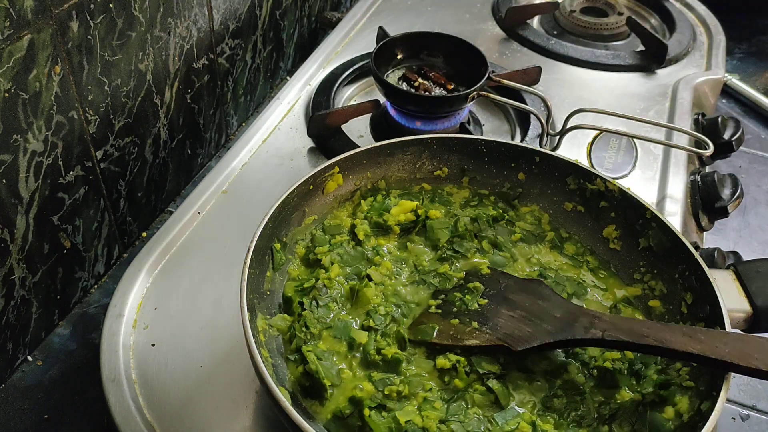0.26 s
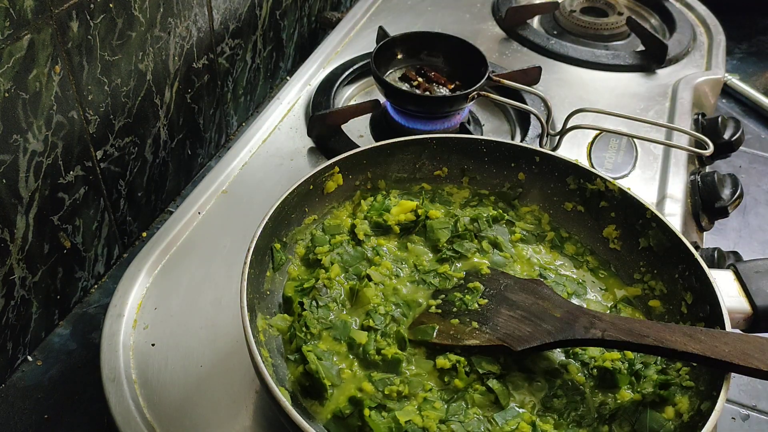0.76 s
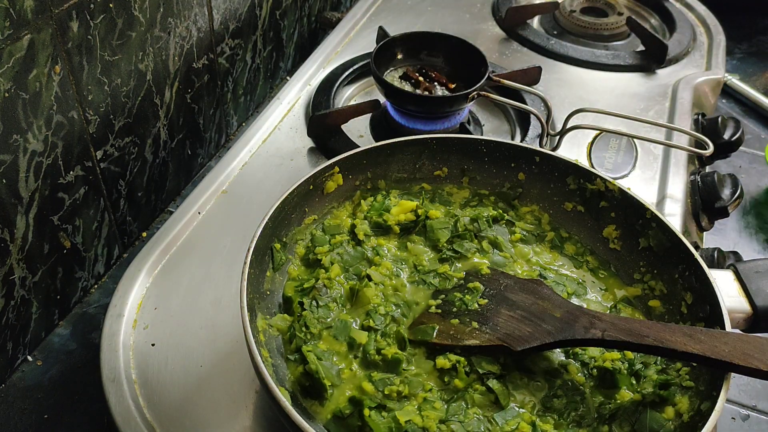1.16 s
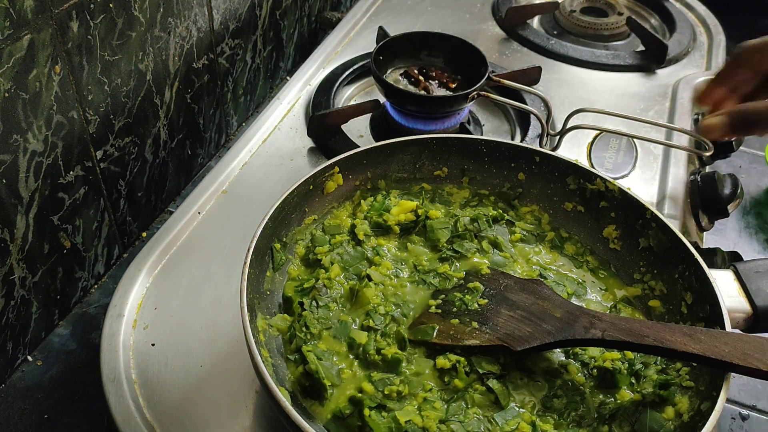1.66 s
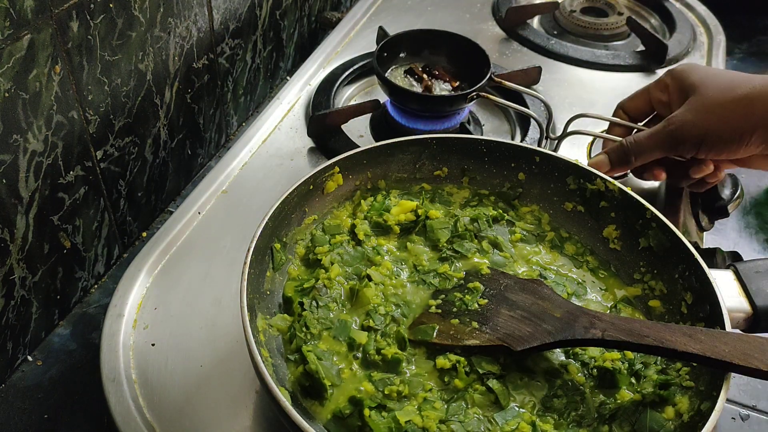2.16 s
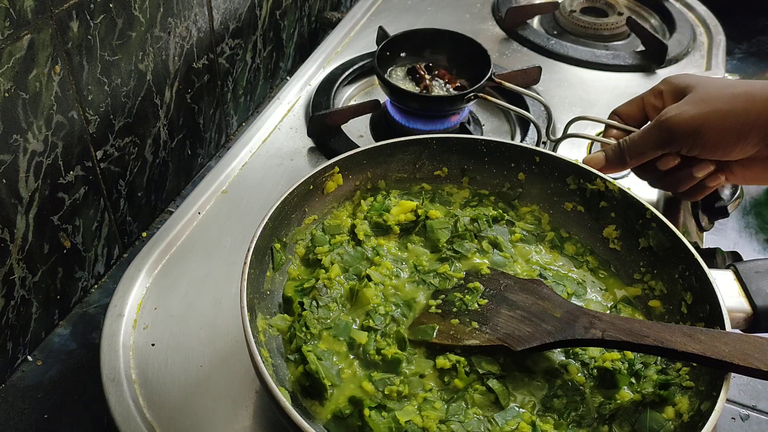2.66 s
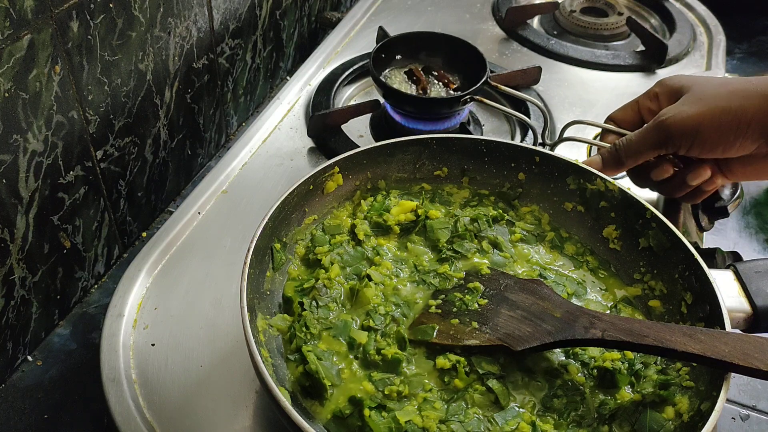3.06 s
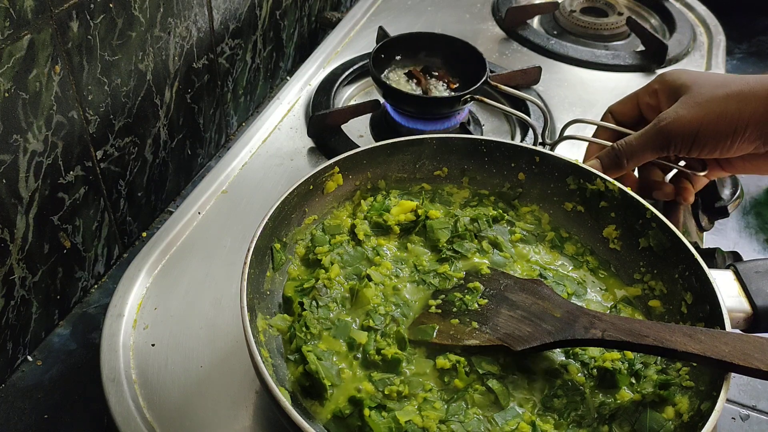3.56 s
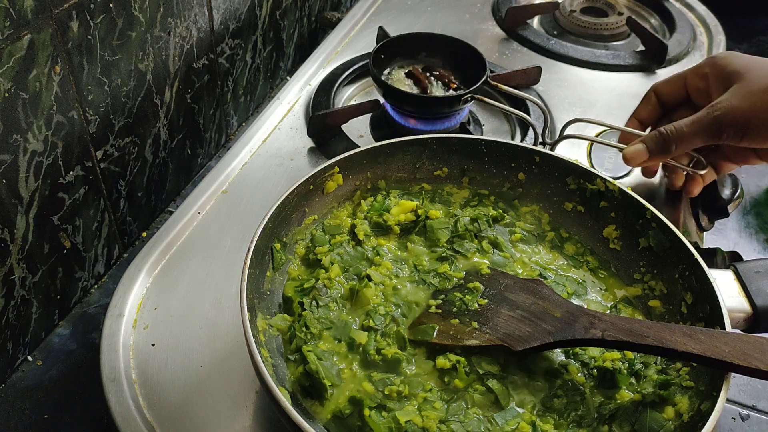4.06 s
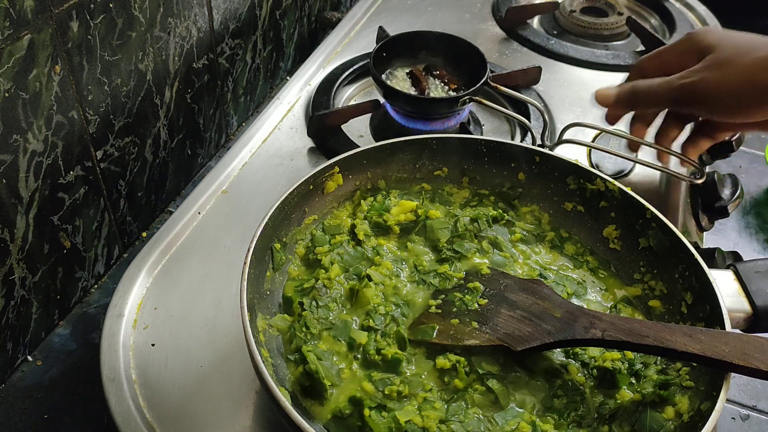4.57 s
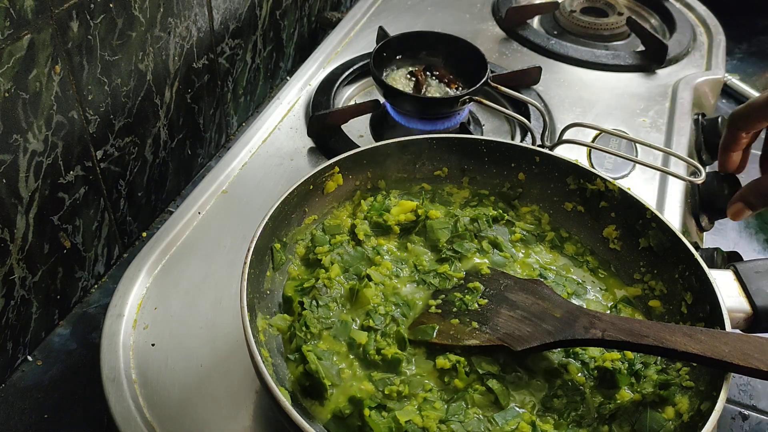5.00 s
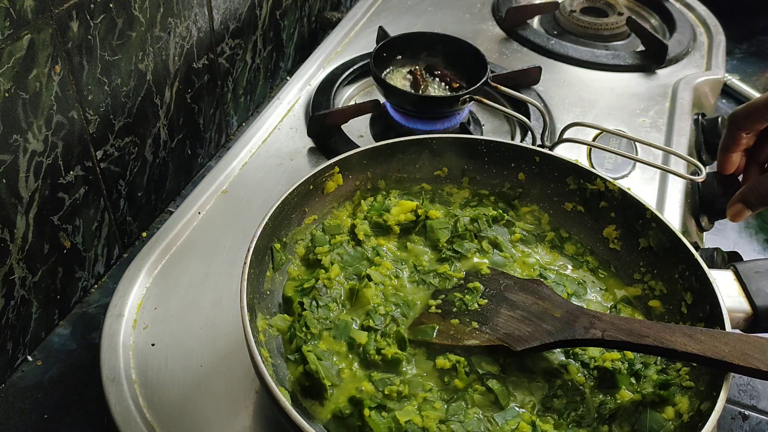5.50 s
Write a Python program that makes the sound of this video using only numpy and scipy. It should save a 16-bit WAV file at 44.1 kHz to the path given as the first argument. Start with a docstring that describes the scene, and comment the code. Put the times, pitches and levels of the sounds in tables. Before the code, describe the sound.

Seeds and lentils pop in hot oil in a small pan, sparse at first, then busier and louder over a faint sizzle. Midway the pan and its wire handle knock lightly on the metal burner stand. A gas flame rushes softly throughout, and a low engine hum from outside swells towards the end. The sound is close, each pop ringing briefly in a hard-walled kitchen.

```python
"""Seeds and lentils pop in hot oil in a small pan on a gas stove; each pop rings out in a hard-walled kitchen.
A hand takes the pan's wire handle and knocks it on the burner stand; the flame rushes softly.
A low engine hum from outside swells towards the end."""
import sys
import numpy as np
from scipy import signal
from scipy.io import wavfile
from scipy.ndimage import uniform_filter1d

SR = 44100
rng = np.random.default_rng(int(sys.argv[2]) if len(sys.argv) > 2 else 0)


def store_wav(level_fs):
    """Save 16-bit WAV to argv[1]."""
    pcm = np.round(np.clip(np.atleast_2d(level_fs), -1, 1) * 32767)
    wavfile.write(sys.argv[1], SR, pcm.T.astype(np.int16))


N = 253134

# the louder seeds bursting: (s, snap dB, snap Hz, puff dB, puff Hz, tick dB, left-right dB of the snap)
POPS = [(0.0056, -43, 5820, -69, 2400, -74, -8), (0.1039, -32.5, 6200, -51.5, 3860, -67, -1.5),
        (0.2151, -42, 5900, -63, 3800, -67, 4), (0.4315, -48.5, 6400, -67, 2700.0, -67, 4),
        (0.6102, -56, 5600, -67, 3860.0, -71, -1.5), (0.7129, -44.5, 6100, -59, 2140.0, -67, 5),
        (0.8872, -55, 5970, -60, 2500, -70, 2.5), (0.9449, -40, 7060, -65, 3140, -64, -5),
        (0.9741, -44.5, 5780.0, -43, 2230, -45, -5), (1.0121, -39, 7070.0, -56, 2130.0, -58, -4.5),
        (1.0422, -43, 6200, -54, 4100, -75, 3.5), (1.0433, -33.5, 6200, -60, 3000.0, -46, 3.5), (1.3107, -36, 6180, -49, 2060, -45.5, -1.5),
        (1.5063, -49, 5900, -43.5, 3120, -65, -12), (1.5533, -41, 6470.0, -52, 3550.0, -68, 2),
        (1.5802, -40.5, 6200, -45, 3380, -53, 6), (1.5921, -37.5, 7110.0, -37.5, 2940, -54, -7),
        (1.5966, -42, 5600, -57, 4140.0, -63.5, 4), (1.7099, -51, 5940, -55, 3140.0, -71, -1),
        (1.7453, -46.5, 6600, -64.5, 2810, -76.0, 2), (1.7777, -48.5, 6740.0, -54.5, 2690, -66, 1),
        (1.8092, -44.5, 6470, -72, 2650.0, -70, -0.5), (1.8743, -43, 5640, -51, 3860, -67, -8),
        (1.9163, -50, 5500, -43.5, 2380, -62, -10), (1.9532, -37, 7100, -41.5, 2720.0, -72, -5),
        (1.9578, -38, 7180.0, -59, 2820, -57, -4), (1.9661, -33.5, 5570, -37.5, 3720, -62, 4),
        (1.9907, -56, 5660, -50, 2590.0, -62.5, -2), (2.0169, -36, 5820.0, -40, 3390.0, -56, 1),
        (2.0216, -27.5, 7840, -36, 3070, -40.5, -7.5), (2.0866, -31.5, 5400, -58, 3900, -70, 1),
        (2.1125, -43, 6600, -49, 3900, -66, 0), (2.2698, -31.5, 6870, -44.5, 2980, -49, -0.5), (2.3368, -42, 5900, -36, 3660, -64, 7),
        (2.378, -52, 5200, -50, 3900, -66, 0), (2.4382, -49, 6750, -70, 3450.0, -60, 8), (2.4978, -49, 5600, -58, 4000.0, -70, 1.5),
        (2.5155, -46, 6840, -51, 2600, -68, -4), (2.601, -47, 6500, -51, 3980, -68.5, -2.5), (2.6102, -31.5, 7400, -41, 3630, -69, -8.5),
        (2.6705, -37.5, 6600, -41.5, 2520, -60, -4), (2.7234, -50, 6000, -57, 2120.0, -45, 9),
        (2.8078, -52, 5130.0, -64, 2500, -53, 0), (2.8282, -47, 6100, -44, 3420, -46, 0),
        (2.8453, -39.5, 7100, -62, 2230, -60, -1), (2.8823, -35, 6730.0, -66, 3080, -63, 2.5),
        (2.8988, -32, 5940, -35.5, 3850.0, -44, 0), (2.9797, -40, 6100, -45, 2680, -48, -2.5),
        (3.0007, -55, 4950.0, -55, 3280, -57, -8), (3.0131, -46, 5120, -40.5, 3200.0, -75, -8),
        (3.0217, -32.5, 5530, -57, 3320, -61, 1.5), (3.0369, -34, 6160, -42, 3770, -48.5, -4),
        (3.095, -47, 4600, -47, 3650, -69, -11), (3.1415, -46, 7040.0, -49, 2650, -61, 5),
        (3.1517, -35.5, 6200, -36.5, 3140, -64, -9), (3.1647, -32, 5600, -40.5, 2750, -49, 3.5),
        (3.1943, -42, 4800, -41, 4000, -58, 2), (3.2551, -42.5, 6950, -50, 3770.0, -73, 7),
        (3.2851, -49, 6160, -58, 2100, -60, -4), (3.3248, -45, 6300, -44, 3200, -68, 2), (3.3263, -30.5, 4950, -60, 3540, -65, 1.5),
        (3.3565, -47, 5800, -53, 3440, -62, -2), (3.3804, -38, 6100, -60, 2760.0, -73, 6),
        (3.4542, -35.5, 6660, -41, 3310.0, -72, -1), (3.468, -43, 6200, -59, 3500, -68, 2), (3.4813, -43.5, 6060, -38, 2280, -44.5, 6),
        (3.5041, -47, 5600.0, -43, 3520, -62, 2), (3.513, -44, 6680.0, -55, 2340, -76, -2),
        (3.5297, -40.5, 5350.0, -43, 3370.0, -63, 2), (3.5445, -32.5, 5850, -38, 2640, -39.5, -2),
        (3.5827, -26, 6740, -37.5, 3380, -44, 4.5), (3.6531, -54, 6220.0, -44, 1980.0, -64, -4),
        (3.6559, -40, 5670.0, -47, 3240.0, -61, -3), (3.6631, -37.5, 6950, -45, 2920.0, -50, 4),
        (3.6678, -44, 5400, -48, 2960, -72, 6), (3.7143, -34.5, 5080.0, -36.5, 3290, -57, -11),
        (3.7352, -43.5, 5790.0, -60, 2570.0, -71, 6.5), (3.7815, -33, 6630, -36.5, 2450, -52, 1),
        (3.8519, -57, 5610.0, -60, 2940, -68, 2), (3.8724, -33, 6400, -45, 3400.0, -65, -1),
        (3.8911, -31, 5570, -32.5, 3130.0, -48, -7), (3.9135, -36, 7100, -46, 3010.0, -51, 3),
        (3.9303, -34, 5500, -29.5, 3390.0, -48, 0), (3.94, -29, 6050, -48, 2320.0, -54, -6),
        (4.0228, -35.5, 6360, -38.5, 3370, -68, 2), (4.0642, -31, 6770, -48, 3440.0, -47, 2.5),
        (4.1203, -32, 6750, -46.5, 2390, -50, -8), (4.19, -27.5, 6020, -28, 3830, -41.5, 2),
        (4.2426, -37.5, 5800, -57, 2920.0, -58, 0.0), (4.2925, -28.5, 4950, -38, 3450, -66, -2.5),
        (4.3161, -45, 6970, -57, 1970.0, -64, -6), (4.3403, -48.5, 5910.0, -50, 3200, -66, 1),
        (4.4029, -53, 5990.0, -56, 2940.0, -48, 5), (4.4727, -56, 4580.0, -43, 2700, -65, -10),
        (4.4901, -33.5, 5270, -38.5, 2750.0, -66, 4.5), (4.5086, -27.5, 6650, -38.5, 3030, -57, -2.5),
        (4.5641, -38, 7160.0, -43, 3360, -55, -3), (4.5833, -36.5, 6600, -42.5, 3330, -46, 1.5),
        (4.638, -54, 5630, -52, 3300, -67, -3), (4.672, -40.0, 6500, -33, 3080, -65, -2),
        (4.6903, -31, 6170, -36.5, 4200, -62, -7.5), (4.7325, -43, 6100, -47, 3400, -64, 0), (4.749, -54, 6000, -44, 2270, -61, 0), (4.767, -40.5, 5450, -46, 2480.0, -59, -11),
        (4.7844, -34, 6800, -42.5, 2630, -54, 2.5), (4.8264, -54, 5240.0, -50, 3710.0, -62, 0),
        (4.8395, -34.5, 5600, -52, 2930, -65, -2.5), (4.8911, -33, 7100, -46, 3350.0, -47, -3),
        (4.9754, -34.5, 4400, -48, 3700, -61, -4), (5.0171, -41, 5100, -45, 3360, -59, 4),
        (5.0538, -42, 4900, -47, 2580, -41.5, 0.0), (5.0645, -50, 5930.0, -47, 3320.0, -59, 1),
        (5.0962, -33, 6600, -43, 4200, -68, -3), (5.0989, -30.5, 5730, -41, 3540, -58, -4.5), (5.1108, -39, 6500, -48, 4200, -67, -5), (5.1235, -47, 5200, -48, 3900, -62, 0), (5.1402, -35, 6660, -55, 2330.0, -54, -3),
        (5.1647, -29, 6300, -49, 3000.0, -45, -5), (5.2583, -28, 7060, -59, 3760.0, -62, -3.5),
        (5.2659, -41, 6130.0, -39, 2920.0, -55, 0), (5.305, -47, 6420.0, -56, 2460.0, -48, -6),
        (5.3253, -43, 5450, -47, 3040, -66, 0), (5.3464, -50, 5430, -35.5, 3380, -54, 3.5),
        (5.3655, -26.5, 5330, -33, 3560, -41, -5.5), (5.4462, -40, 5510.0, -47, 3700.0, -75, -10),
        (5.4688, -29, 5830, -34.5, 3780, -48, -1), (5.5105, -37, 7000, -62, 3020.0, -63, 1),
        (5.5766, -40, 6240, -38.5, 3500, -54, -6), (5.5824, -36, 7200, -45, 3590.0, -62, -1),
        (5.6317, -34.5, 5600, -36, 3270, -46, 1.5), (5.6567, -29.5, 6220.0, -35, 3580, -55, -8),
        (5.7041, -40.5, 5830.0, -43, 2250.0, -51, 0)]
# the oil heating up: (s, sizzle dB)
OIL = [(0.0, -74.5), (0.7, -87), (1.5, -86), (2.3, -76), (3.1, -66.5), (3.4, -83), (4.1, -67.5), (4.7, -69.5), (5.74, -66.5)]
# pan and handle knocking and sliding on the stand: (s, peak dB, highest mode fully rung Hz, rise s, contact s)
KNOCKS = [(1.577, -47.5, 337, 0.0033, 0.017), (2.018, -51.5, 500, 0.0012, 0.0057), (2.055, -49.5, 860, 0.014, 0.035), (2.178, -45.5, 770, 0.0019, 0.015), (2.48, -42, 297, 0.014, 0.042), (2.624, -34.5, 790, 0.0011, 0.013), (2.65, -46, 800, 0.013, 0.049), (2.694, -44.5, 820, 0.0017, 0.011), (2.74, -46.5, 800, 0.0069, 0.026), (2.785, -40, 450, 0.018, 0.016), (2.83, -50.5, 640, 0.0082, 0.032), (2.927, -38, 470, 0.0037, 0.019), (3.638, -48, 790, 0.0056, 0.0095), (4.118, -54, 600, 0.0024, .01), (4.797, -41.5, 300, 0.0013, 0.003), (5.215, -48, 800, 0.0068, 0.011)]
STAND = [(306, -4, 0.15), (374, -8.5, 0.3), (482, -2, 0.13), (584, -4.5, 0.15), (717, -2, 0.022), (765, -1, 0.16), (920, -13.5, 0.083), (1173, -17, 0.17), (1420, -14, 0.041), (1700, -15.5, 0.027)]   # (Hz, dB, t60 s)
TAPS = [(0.9735, -34.5, 4930, 0.0003, 0.024)]   # a utensil set down: (s, peak dB, highest mode fully rung Hz, rise s, contact s)
UTENSIL = [(430, -16, .06), (560, -6, .05), (745, -5, .05), (960, -8, .04), (1160, -10, .04), (2070, -21, .04), (2250, -18, .05), (2450, -22, .03), (3620, -23, .03), (3790, -22, .04), (5000, -27, .03)]   # (Hz, dB, t60 s)  # fixed
# outside engine: (s, 1st, 2nd, 3rd multiple dB)
ENGINE = [(0.0, -73, -66.5, -75), (0.75, -66, -72.5, -68), (1.2, -58.5, -74, -73), (1.97, -60, -69, -64),
          (3.12, -70, -61, -68.5), (3.84, -56.5, -74.5, -58.5), (4.01, -61, -69.5, -66.5), (4.09, -52.5, -52.5, -62),
          (4.59, -57, -80, -51), (4.75, -51.5, -52.5, -50), (4.84, -71, -84, -56), (5.02, -46.5, -73, -51),
          (5.15, -58, -56, -52), (5.23, -50.5, -53, -77), (5.28, -58, -95, -53), (5.32, -47, -55, -59),
          (5.58, -87, -50.5, -58.5), (5.74, -58, -49.5, -57.5)]
FLAME = [(8.8, -31), (15, -1), (43, -9), (80, -37.5), (96, -5), (219, -17.5), (256, -20.5), (916, -22), (1330, -51.5),
         (1520, -27.5), (3020, -39.5), (5410, -36), (6180, -39.5), (7440, -41), (8500, -93.5), (11000, -99), (18700, -120)]   # flame and street rumble: (Hz, dB per Hz)
FLAME_LEVEL = [(0.0, -60.5, -52.5), (0.6, -62, -59), (1.2, -60, -58), (2.0, -59.5, -61.5), (2.7, -57.5, -57.5), (3.5, -58.5, -58),
               (4.4, -56, -58.5), (5.1, -54, -55.5), (5.74, -55, -51)]   # (s, rush dB, rumble dB)
LIKENESS = [(100, 0.97), (300, 0.68), (700, 0.44), (1500, 0.11), (6000, 0.017)]   # (Hz, left-right likeness)
PORTS = [[(5990, 1026, 13), (7340, 510, 11.5)], [(5300, 930, -6.5), (7970, 1400, 18.5)]]   # left, right microphone port: (Hz, width Hz, dB)
PORT_DB = [5, 2]   # treble sensitivity left, right
KITCHEN_T60_S, KITCHEN_DB = 0.39, -9   # fixed
CUTOFF_HZ = 8800   # fixed
ENGINE_HZ = 60.66   # firing rate
PAN_HOLLOW = (2200, 450, 6)   # air in the pan: (Hz, width Hz, dB)  # fixed
PAN_ECHOES = [(.0013, -16), (.0022, -11), (.0036, -22), (.0087, -17)]   # pan wall and stove top: (delay s, dB)  # fixed
SNAP_HZ, SNAP_SPREAD_HZ = 6100, 760   # pitch of a small seed's snap, and how seeds differ
SMALL_FROM_S, SMALL_COUNT = 1.6, 20   # small seeds start bursting once the oil is hot  # fixed
SMALL_SNAP_DB, SMALL_PUFF_DB, SMALL_SPREAD_DB, SMALL_PUFF_HZ = -56, -48, 2, 3200
BURSTS_PER_S = 180
TICK_HZ, TICK_DB, TICK_S = 930, -10.5, 0.0045   # the pan floor ticks under each puff: pitch, level re a small seed's puff, decay
BURNER_PEAKS = [(314.2, 13, 8), (914, 46, 2.5)]   # the rush rings in the stove: (Hz, width Hz, dB)
SPOTS = 5   # places in the pan, each with its own paths to the walls  # fixed
OIL_WALLS_DB, STAND_WALLS_DB = 6.5, 4   # share of each source that reaches the walls
LUMP_DB, LUMP_S, LUMPS_FADE_S = 3.5, .0012, .04   # early reflections come as separate lumps: spread, width, time to blend  # fixed


def from_db(db):
    return 10 ** (np.asarray(db) / 20)


def rms_one(x):
    return x / np.sqrt(np.mean(x ** 2) + 1e-20)


def in_time(rows):
    s, *columns = np.transpose(rows)
    return [np.interp(np.arange(N) / SR, s, c) for c in columns]


def at_hz(points, hz):
    return np.interp(np.log(hz), np.log(np.array(points)[:, 0]), np.array(points)[:, 1])


def butter(x, hz, kind, order=2):
    return signal.sosfilt(signal.butter(order, hz, kind, fs=SR, output="sos"), x)


def drift(rate):
    """Slow chance: noise through a double one-pole low-pass, run in; spread 1."""
    r = np.exp(-80 * np.pi * rate / SR)  # fixed
    slow = signal.lfilter([1], [1, -2 * r, r * r], rng.standard_normal(N // 40 + 2002))[2000:]
    return np.interp(np.arange(N) / 40, np.arange(len(slow)), rms_one(slow))


def ring(clicks, hz, t60):
    """A unit click sets a sine of height 1 ringing."""
    r, w = from_db(-60 / (t60 * SR)), 2 * np.pi * hz / SR
    return signal.lfilter([0, np.sin(w)], [1, -2 * r * np.cos(w), r * r], clicks + 1e-18)


def pops(rows, rise_s=.00006, snap_s=0.00013, body_s=0.00067, rough=1.0, lag_s=.00002):
    """Each seed coat snaps: a few gritty cycles at its own pitch over a lower puff of vapour and a tick of the pan."""
    out, t = np.zeros((2, N + 420)), np.arange(400) / SR
    *grit, puff = rng.standard_normal((len(rows), 3, 400)).transpose(1, 0, 2)
    far, slow = rng.random((len(rows), 2)).T[..., None]   # place in the pan, slowness of the tear
    rise = 1 - np.exp(-t / rise_s)
    tear = rise * np.exp(-t / (snap_s * (0.62 + 2.7 * slow)))
    ticks = butter(puff * rise * np.exp(-t / TICK_S), [TICK_HZ / 1.98, TICK_HZ * 1.57], "band")
    for k, (s, snap_db, snap_hz, body_db, body_hz, tick_db, pan_db) in enumerate(rows):
        body = (np.sin(2 * np.pi * body_hz * t) + 1.4 * puff[k]) * rise * np.exp(-t / body_s)
        body = butter(body, [body_hz / 2.9, body_hz * 3.2], "band")
        body = from_db(body_db) * body / np.linalg.norm(body) + from_db(tick_db) * ticks[k] / np.linalg.norm(ticks[k])
        # the grit scatters differently to each port
        snaps = (np.sin(2 * np.pi * snap_hz * t) + rough * (grit[0][k] + [[0], [.89]] * grit[1][k])) * tear[k]
        snaps = butter(snaps, [snap_hz / 1.57, snap_hz * 1.8], "band")
        for side, (snap, lag) in enumerate(zip(snaps, [lag_s * (1 + far[k, 0]), 0])):   # the left port is further off
            gain, at = from_db(snap_db + (.5 - side) * pan_db), round((s + lag) * SR)
            out[side, at:at + 400] += 2 * (gain * snap / np.linalg.norm(snap) + body)
    return out[:, :N]


def sizzle(per_s, level_db):
    """Tiny vapour bursts at random, in clumps, each ringing a couple of cycles."""
    sizes = from_db(3.0 * np.minimum(rng.exponential(1, N), 3)) * rng.choice([-1, 1], N)  # fixed
    born = rng.random(N) < per_s * from_db(4 * drift(8)) / SR
    pitches, dealt = np.geomspace(3500, 8000, 10), rng.integers(0, 10, N)
    rings = sum(ring(sizes * born * (dealt == k), hz, 9.1 / hz) for k, hz in enumerate(pitches))
    rings = from_db(level_db) * rms_one(butter(rings, 1800, "high"))
    return np.array([np.roll(rings, 3), rings])


def struck(blows, modes, focus_db, spread_db):
    """A rough contact shakes every mode; a soft blow leaves the high modes weak."""
    out, t = np.zeros(N), np.arange(SR // 7) / SR
    grit = rng.standard_normal((len(blows), len(modes), len(t) + 1))
    for k, (hz, level_db, t60) in enumerate(modes):
        force = np.zeros(N + len(t))
        for (s, peak_db, best_hz, rise_s, contact_s), noise in zip(blows, grit[:, k]):
            rub = noise[1:] * np.minimum(t / rise_s, 1) * np.exp(-np.maximum(t - rise_s, 0) / contact_s)
            share = np.abs(np.sum(rub * np.exp(2j * np.pi * hz * t))) + 0.5 * np.linalg.norm(rub)  # push at the mode's pitch
            gain = from_db(peak_db + level_db + spread_db * noise[0] - focus_db * max(0, np.log2(hz / best_hz)))
            force[round(s * SR):][:len(t)] += gain * rub / share
        out += ring(force[:N], hz, t60)
    return out


def engine(waver_hz=0.603, flutter_db=0.5):
    """Three multiples of the firing rate, wavering a little in pitch and level."""
    turn = 2 * np.pi * np.cumsum(ENGINE_HZ + waver_hz * drift(2.15)) / SR
    return sum(np.sqrt(2) * from_db(db + flutter_db * drift(0.52)) * np.sin((k + 1) * turn + k)
               for k, db in enumerate(in_time(ENGINE)))


def flame(patchy_db=2.0):  # fixed
    """Half-octave bands of turbulent noise, alike in both ports in the bass; a deep rumble below."""
    rush_db, rumble_db = in_time(FLAME_LEVEL)
    out, edges = 0, 64 * 2 ** np.arange(0, 7.6, .5)
    white = rng.standard_normal((2, 2, N))
    for k, (low, high) in enumerate(zip(edges, edges[1:])):
        mid, side = butter(white[k % 2], [low, high], "band")
        hz = np.sqrt(low * high)
        alike = np.clip(at_hz(LIKENESS, hz), 0, 1)
        gain = from_db(at_hz(FLAME, hz) + patchy_db * drift(3.05))
        out = out + gain * (np.sqrt(1 + alike) * mid + np.sqrt(1 - alike) * side * [[1], [-1]])
    for peak in BURNER_PEAKS:
        out = lift(out, *peak)
    mid, side = butter(rng.standard_normal((2, N + SR)), [24, 42], "band")[:, SR:]
    rumble = mid + from_db(-20.5) * side * [[1], [-1]]
    return from_db(rush_db) * rms_one(out) + from_db(rumble_db) * rms_one(rumble)


def kitchen(x, first_s=.003, build_s=.003, near_s=.012, near_spread_s=.006, near_db=2.5):  # fixed
    """Reflections, lumpy at first and strongest from the nearest walls, then dense and dying away; unrelated in the two ports."""
    t = np.arange(SR // 2) / SR
    shape = (1 - np.exp(-np.maximum(t - first_s, 0) / build_s)) * from_db(-60 * t / KITCHEN_T60_S)
    lumps = rms_one(uniform_filter1d(rng.standard_normal(len(t)), size=round(LUMP_S * SR)))
    shape = shape * from_db(near_db * np.exp(-((t - near_s) / near_spread_s) ** 2) + LUMP_DB * lumps * np.exp(-t / LUMPS_FADE_S))
    tails = rng.standard_normal((2, len(t))) * shape / np.sqrt(np.sum(shape ** 2))
    return from_db(KITCHEN_DB) * signal.fftconvolve(x[None], tails, axes=1)[:, :N]


def lift(x, hz, width_hz, lift_db):
    """Adds a resonant peak to a flat response."""
    r = np.exp(-np.pi * width_hz / SR)
    b, a = [(1 - r * r) / 2, 0, (r * r - 1) / 2], [1, -2 * r * np.cos(2 * np.pi * hz / SR), r * r]
    return x + (from_db(lift_db) - 1) * signal.lfilter(b, a, x)


def with_echoes(x):
    """Close hard surfaces repeat each burst within a few ms, with turning signs."""
    kernel = np.zeros(SR // 100)
    kernel[0] = 1
    for k, (delay_s, level_db) in enumerate(PAN_ECHOES):
        kernel[round(delay_s * SR)] = from_db(level_db) * (-1) ** k
    return signal.fftconvolve(x, kernel[None], axes=1)[:, :N]


def small_pops():
    """Rows like POPS for the many lesser seeds, at random moments."""
    when, (snap, pitch, puff, tone, pan) = rng.random(SMALL_COUNT), rng.standard_normal((SMALL_COUNT, 5)).T
    puff_db = SMALL_PUFF_DB + 2 * SMALL_SPREAD_DB * puff
    s = SMALL_FROM_S + when * (N / SR - SMALL_FROM_S)
    return list(zip(s, SMALL_SNAP_DB + SMALL_SPREAD_DB * snap, SNAP_HZ + SNAP_SPREAD_HZ * pitch, puff_db,
                    SMALL_PUFF_HZ * from_db(3.0 * tone), puff_db + TICK_DB, SMALL_SPREAD_DB * pan))


def sideways(oil):
    """What leaves the pan towards the walls is fuller: the hollow rings and the treble is shaded."""
    out = butter(lift(oil.mean(0), *PAN_HOLLOW), 8900, "low", order=4)
    return out + from_db(-2.5) * butter(out, 5300, "low")


def scene():
    """Oil and knocks with their reflections over flame and engine."""
    seeds = POPS + small_pops()
    spots = [pops(seeds[k::SPOTS]) for k in range(SPOTS)] + [sizzle(BURSTS_PER_S, *in_time(OIL))]
    walls = sum(kitchen(sideways(oil)) for oil in spots)
    oil = (with_echoes(sum(spots)) + walls * from_db(OIL_WALLS_DB)) * from_db(PORT_DB)[:, None]
    knocks = struck(KNOCKS, STAND, focus_db=9.5, spread_db=1.5) + struck(TAPS, UTENSIL, focus_db=13.0, spread_db=1.6)
    knocks = knocks * from_db([[.6], [-.6]]) + kitchen(knocks) * from_db(STAND_WALLS_DB)
    return oil + knocks + flame() + engine()


def record(dry):
    """Each port lifts the treble at its own resonances; the capsule falls off fast above 7.7 kHz."""
    out = [lift(lift(x, *low), *high) for x, (low, high) in zip(dry, PORTS)]
    rolled = signal.sosfilt(signal.cheby2(10, 22, 8250, fs=SR, output="sos"), np.array(out))
    return signal.sosfilt(signal.cheby2(5, 26, CUTOFF_HZ, fs=SR, output="sos"), rolled)


dry = scene()
out = record(dry)
store_wav(out)
```